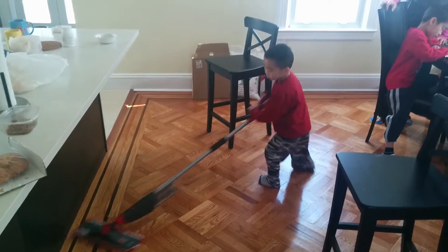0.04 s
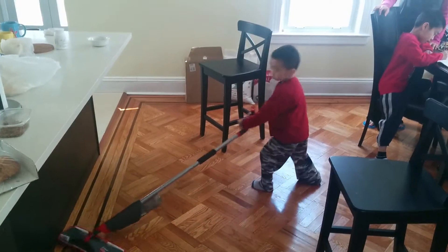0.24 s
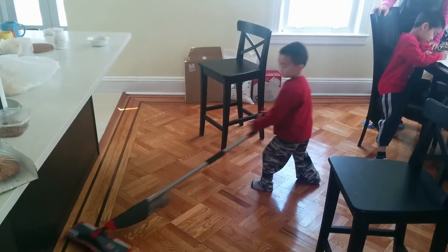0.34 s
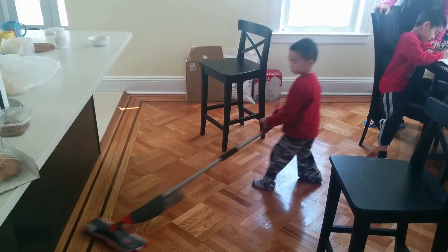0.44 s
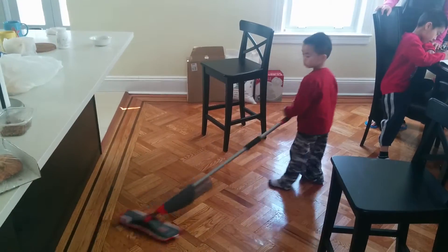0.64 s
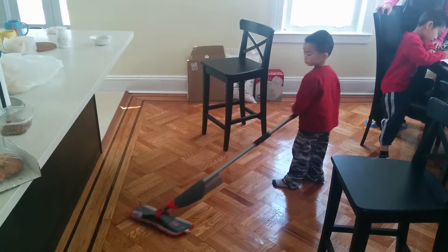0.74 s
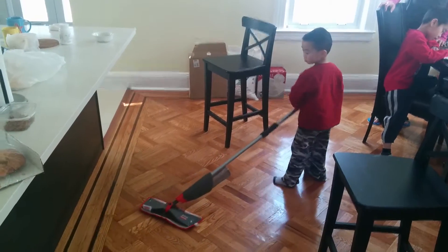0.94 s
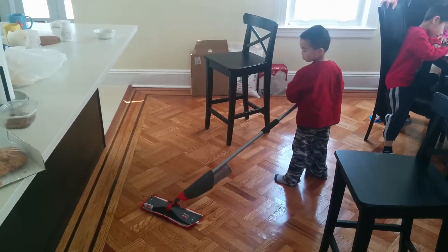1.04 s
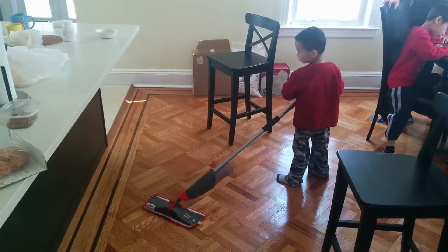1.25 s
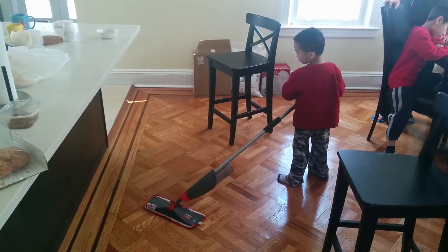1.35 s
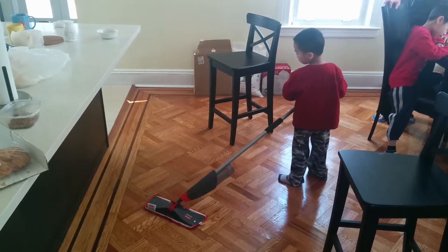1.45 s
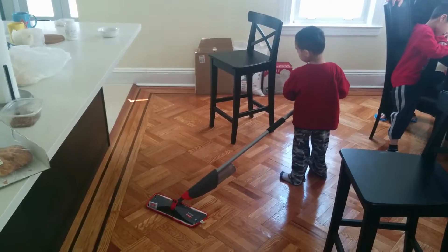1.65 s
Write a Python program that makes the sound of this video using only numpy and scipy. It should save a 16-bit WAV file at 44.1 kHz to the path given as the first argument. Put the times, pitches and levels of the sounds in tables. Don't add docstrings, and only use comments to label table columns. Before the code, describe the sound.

In a bare, echoing room, a camera microphone at some distance catches a mop's gritty slide, one boomy thump with quick rebounds, then quiet scuffing, a hollow stool knock and a small hard tick over unsteady low hum.

```python
import sys
import numpy as np
from scipy import signal
from scipy.io import wavfile
from scipy.ndimage import uniform_filter1d

SR = 44100
rng = np.random.default_rng(int(sys.argv[2]) if len(sys.argv) > 2 else 0)


def unload_wav(signal):
    wavfile.write(
        sys.argv[1],
        SR,
        np.round(np.clip(np.atleast_2d(signal).T, -1, 1) * 32767).astype(np.int16),
    )


def amplitude_ratio(level_db):
    exponent = np.asarray(level_db, float) / 20
    return 10 ** exponent


N = 74970

# (time [s], level [dB])
PAD_SPEED = [
    (0, -52.5),
    (.1, -47),
    (0.172, -46),
    (0.212, -42),
    (.25, -70),
    (0.549, -43.5),
    (.65, -59),
    (.8, -56),
    (0.998, -65),
    (1.7, -78),
]
# (frequency [Hz], level [dB per Hz])
PAD_SPECTRUM = [(90, -1.5), (170, -3.5), (330, -3.5), (700, -5), (1800, -8), (4000, -12.5), (9000, -21.5),
                (15000, -34)]
# (frequency [Hz], level [dB per Hz])
HISS_SPECTRUM = [(80, -18), (130, -23), (250, -20.5), (500, -30), (1500, -31), (4000, -35.5), (9000, -38.5),
                 (15700, -39.5)]
# (time [s], expander depth [dB], half width [s], hum sag [dB])
HUM_LULLS = [(0, 4.5, 0.02, -4), (.07, 1, 0.0087, 10), (0.164, 0, 0.0103, 3), (0.548, 7, 0.025, 0),
             (.605, 0.5, 0.0081, 7.5), (0.688, 11, 0.019, 5), (0.853, 21, 0.031, 12),
             (0.924, 6.5, 0.00564, 6), (0.989, 12, 0.016, 13), (1.036, 15, 0.018, 4.5),
             (1.103, 6.5, 0.011, 3.5), (1.155, 5.5, 0.016, 6), (1.2, 0.86, 0.045, 8), (1.34, 2, 0.034, 5),
             (1.395, 10, 0.015, 5), (1.429, 6, .024, 4), (1.491, .3, 0.017, 20), (1.51, 5, 0.0086, 5),
             (1.632, 4.5, 0.065, 0.8), (1.67, 1, 0.011, -1.3)]
# (time [s], strength [dB], share of low push [dB])
THUMP_CONTACTS = [
    (.2275, -12.5, 2.5),
    (.240, -31, 2.5),
    (.250, -23, 2),
    (.258, -19, 2),
    (.285, -31, -6.5),
    (.297, -18.5, -2),
]
# (frequency [Hz], level [dB per Hz])
THUMP_SPECTRUM = [(120, -20.5), (250, -2), (500, -9.5), (1100, -13), (2300, -12), (4200, -19), (6500, -27),
                  (15500, -42.5)]
# (frequency [Hz], level [dB], t60 [s])
CABINET_MODES = [(50.5, -3, 0.85), (59.94, 3, 0.77), (69.8, -7.5, 0.14), (82.5, -1.5, 0.23),
                 (96.8, 1, 0.21), (119.3, -1.5, 0.36), (150.6, -3.5, 0.31), (187, -1.5, 0.17),
                 (216.7, -7.5, 0.425), (257, -8, 0.15), (309.4, -9, 0.28), (417.4, -14.5, 0.71),
                 (493.7, -24, 0.39), (700.9, -13.5, 0.33)]
# (time [s], strength [dB], share of wood ring [dB])
SCUFF_CONTACTS = [
    (.617, -45, -30),
    (.628, -53, -40),
    (.642, -51.5, -40),
    (.745, -69, -43),
    (.775, -60, -26),
    (.889, -58, -22),
    (1.163, -73, -45),
]
# (frequency [Hz], level [dB per Hz])
SCUFF_SPECTRUM = [(600, 1), (1500, -6), (2800, -3), (5300, 1), (8000, -14), (15500, -25)]
# (time [s], strength [dB], share of wood ring [dB])
KNOCK_CONTACTS = [
    (1.178, -34, -4),
    (1.188, -54, -5),
    (1.195, -60, 10.5),
    (1.255, -55, -0.5),
    (1.285, -47, -8),
]
# (frequency [Hz], level [dB per Hz])
KNOCK_SPECTRUM = [(250, -20), (450, -8.5), (800, -5), (1500, -15.5), (2100, -11), (4500, -13.5),
                  (7500, -19), (15500, -40)]
# (frequency [Hz], level [dB], t60 [s])
STOOL_MODES = [(144, -12.5, 0.063), (204, -19, 0.071), (295.6, -4.5, 0.12), (342, -8.5, 0.21),
               (384, 3.5, 0.092), (408.4, 5, 0.087), (444, 6, 0.065), (469.5, -13.5, 0.29),
               (561, -9.5, 0.17), (590, -16, 0.18)]
TICK_DB = -37.5
# (time [s], strength [dB], share of ring [dB])
TICK_CONTACTS = [
    (1.458, TICK_DB, 0),
]
# (frequency [Hz], level [dB per Hz])
TICK_SPECTRUM = [(600, -23), (1150, -12), (1700, 0), (2500, 10), (3800, 1.5), (5200, -11), (15500, -30)]
# (frequency [Hz], level [dB], t60 [s])
PLASTIC_MODES = [(1720, -7, .02), (2330, -1, .022), (2610, 0, .035), (3600, -11, .012), (1150, -15, .02),
                 (95, -9, .1)]
# (frequency [Hz], t60 [s])
ROOM_DECAY = [(125, 0.67), (300, 0.43), (1000, 0.62), (3000, 0.61), (6000, .7), (12000, 0.54)]

STOOL_DB = -34.5
HUM_HZ, HUM_DB, HUM_WIDTH_HZ, HUM_FUZZ_DB = 60.8, -44, 40, -12
IDLE_DB, OPEN_DB, OPEN_SLOPE, LULL_EDGE = -4, -44, 0.84, 2.65


def evened(x):
    return x / np.sqrt(np.mean(x ** 2) + 1e-20)


def read(points, hz):
    f, value = np.transpose(points)
    return np.interp(np.log(hz + 1), np.log(f + 1), value)


def colour(x, points):
    hz = abs(np.fft.fftfreq(2 ** 13, 1 / SR))
    log_gain = np.log(amplitude_ratio(np.maximum(read(points, hz), -100)))
    phase = -signal.hilbert(log_gain).imag
    taps = np.fft.ifft(np.exp(log_gain + 1j * phase)).real[:2 ** 12]
    return signal.fftconvolve(x, taps / np.linalg.norm(taps))[:len(x)]


def slide():
    grains_per_s = 3600
    spread_db = 0 * np.minimum(rng.exponential(1, N), 5)
    hit = rng.random(N) < grains_per_s / SR
    grit = amplitude_ratio(spread_db) * hit * rng.standard_normal(N)
    s, db = np.transpose(PAD_SPEED)
    speed = amplitude_ratio(np.interp(np.arange(N) / SR, s, db))
    return speed * evened(colour(grit, PAD_SPECTRUM))


def background():
    t = np.arange(N) / SR
    turn = np.exp(2j * np.pi * HUM_HZ * t)
    r = np.exp(-np.pi * HUM_WIDTH_HZ / SR)
    fuzz = rng.standard_normal(N) + 1j * rng.standard_normal(N)
    fuzz = signal.lfilter([1], np.convolve([1, -r], [1, -r]), fuzz)
    skirt = evened((turn * fuzz).real)
    hum = np.sqrt(2) * turn.imag + amplitude_ratio(HUM_FUZZ_DB) * skirt
    sag_db = sum(db * np.exp(-((t - s) / half) ** 2) for s, _, half, db in HUM_LULLS)
    hiss = evened(colour(rng.standard_normal(N), HISS_SPECTRUM))
    return amplitude_ratio(HUM_DB - sag_db) * hum + amplitude_ratio(-52) * hiss


def blows(contacts, modes, ring_db, push_s):
    crack_s = .002
    t, cracks, rings = np.arange(N) / SR, np.zeros(N), np.zeros(N)
    noise = rng.standard_normal(N)
    for s, db, share_db in contacts:
        since = np.maximum(t - s, 0)
        cracks += amplitude_ratio(db) * (t >= s) * np.exp(-since / crack_s) * noise
        push = 1 - np.exp(-since / push_s)
        for hz, mode_db, t60 in modes:
            level = amplitude_ratio(ring_db + share_db + mode_db - 60 * since / t60)
            rings -= level * np.sin(2 * np.pi * hz * since) * push
    return cracks, rings


def diffuse(cracks):
    build_s = 0.004
    hz, t, z = signal.stft(rng.standard_normal(N), SR, nperseg=256, noverlap=192)
    energy = np.interp(t, np.arange(N) / SR, np.cumsum(cracks ** 2))
    power = np.diff(energy, prepend=0)[None]
    decay = amplitude_ratio(-60 * t / read(ROOM_DECAY, hz)[:, None]) ** 2 * (1 - np.exp(-t / build_s))
    decay = decay / decay.sum(axis=1).mean() / (t[1] * SR)
    field = signal.fftconvolve(power, decay, axes=1)[:, :len(t)]
    return signal.istft(z * np.sqrt(abs(field)), SR, nperseg=256, noverlap=192)[1][:N]


def in_room(cracks, spectrum, dry_db):
    wet_db = 8
    return colour(amplitude_ratio(dry_db) * cracks + amplitude_ratio(wet_db) * diffuse(cracks), spectrum)


def thump():
    cracks, rings = blows(THUMP_CONTACTS, CABINET_MODES, ring_db=-23.5, push_s=0.0016)
    return in_room(cracks, THUMP_SPECTRUM, dry_db=-8), rings


def scuffs():
    cracks, rings = blows(SCUFF_CONTACTS, STOOL_MODES, STOOL_DB, push_s=.004)
    return in_room(cracks, SCUFF_SPECTRUM, dry_db=-3), rings


def knock():
    cracks, rings = blows(KNOCK_CONTACTS, STOOL_MODES, STOOL_DB, push_s=.004)
    return in_room(cracks, KNOCK_SPECTRUM, dry_db=-6), rings


def tick():
    cracks, rings = blows(TICK_CONTACTS, PLASTIC_MODES, ring_db=-35, push_s=.0003)
    return in_room(cracks, TICK_SPECTRUM, dry_db=3), rings


def room(x):
    hz, t, z = signal.stft(rng.standard_normal(SR), SR, nperseg=256)
    decay = amplitude_ratio(-60 * t / read(ROOM_DECAY, hz)[:, None])
    tail = signal.istft(z * decay, SR, nperseg=256)[1]
    return signal.fftconvolve(x, tail / np.linalg.norm(tail))[:N]


def scene():
    boom_db = -5.5
    mix, rings = slide() + background(), np.zeros(N)
    for source in [thump, scuffs, knock, tick]:
        crack, ring = source()
        mix = mix + crack
        rings = rings + ring
    return (mix + rings + amplitude_ratio(boom_db) * room(rings))[None]


def top_cut(x):
    return signal.sosfilt(signal.butter(12, 15850, fs=SR, output="sos"), x)


def record(dry):
    t = np.arange(N) / SR
    low_cut = signal.butter(4, 41.5, "high", fs=SR, output="sos")
    mic = signal.sosfilt(low_cut, dry)
    lull_db = sum(db * np.exp(-abs((t - s) / half) ** LULL_EDGE) for s, db, half, _ in HUM_LULLS)
    level_db = 10 * np.log10(abs(uniform_filter1d(mic[0] ** 2, 900)) + 1e-12)
    opening_db = OPEN_SLOPE * np.maximum(level_db - OPEN_DB, 0)
    gain_db = np.minimum(IDLE_DB + opening_db, 0) - lull_db
    high_cut = signal.firwin(511, 15800, window=("kaiser", 9), fs=SR)
    mix = signal.oaconvolve(mic * amplitude_ratio(gain_db), high_cut[None], "same")
    return top_cut(mix)


dry = scene()
out = record(dry)
unload_wav(out)
```